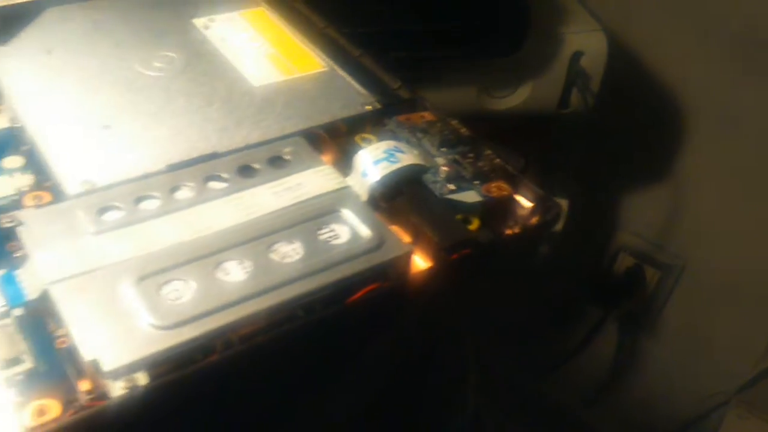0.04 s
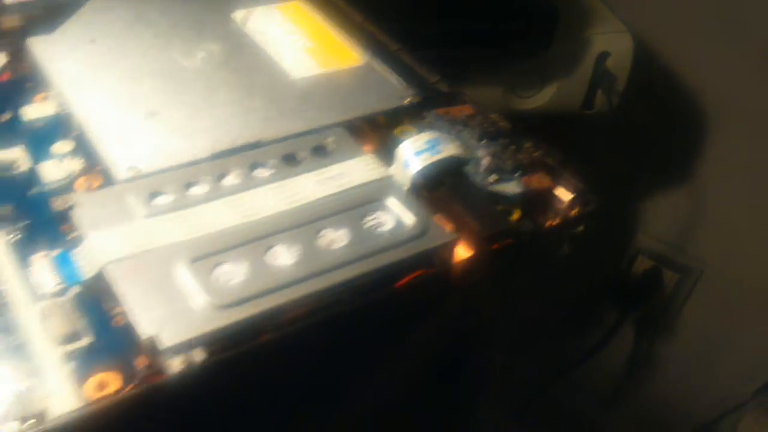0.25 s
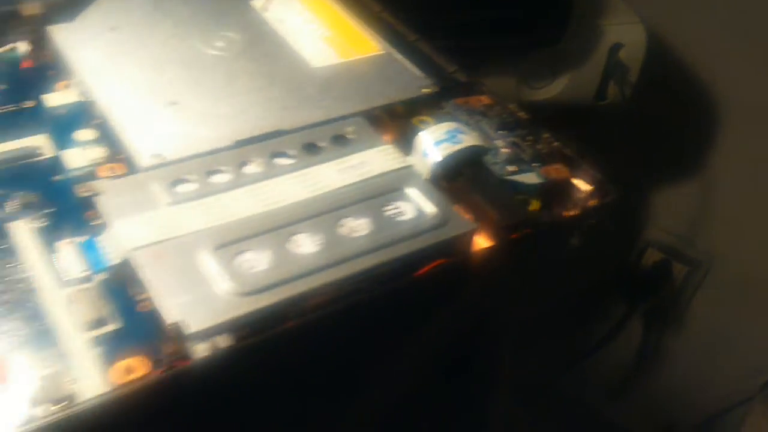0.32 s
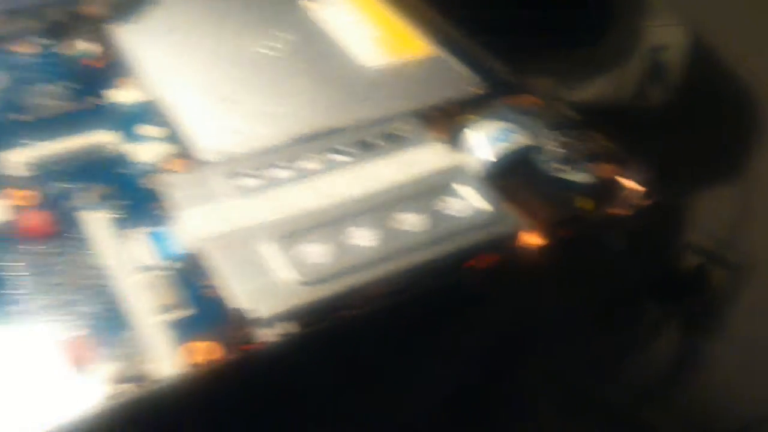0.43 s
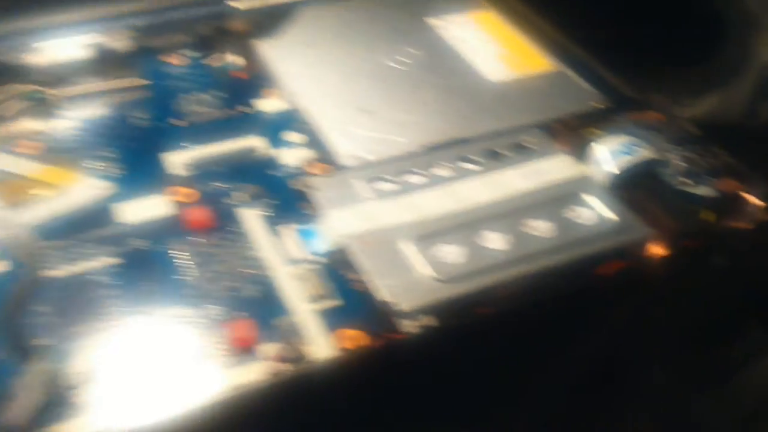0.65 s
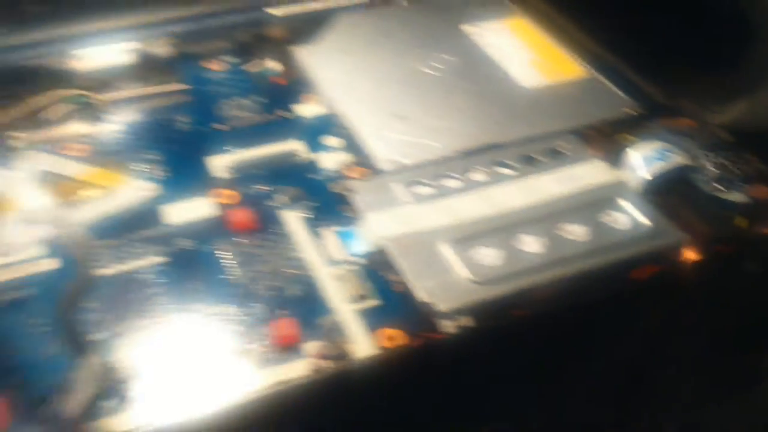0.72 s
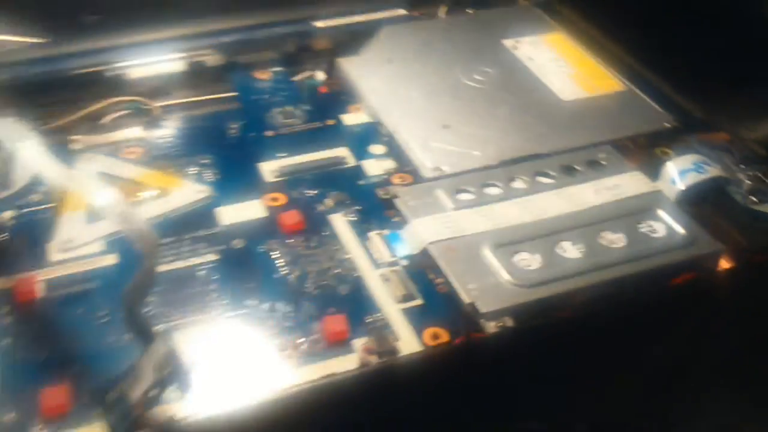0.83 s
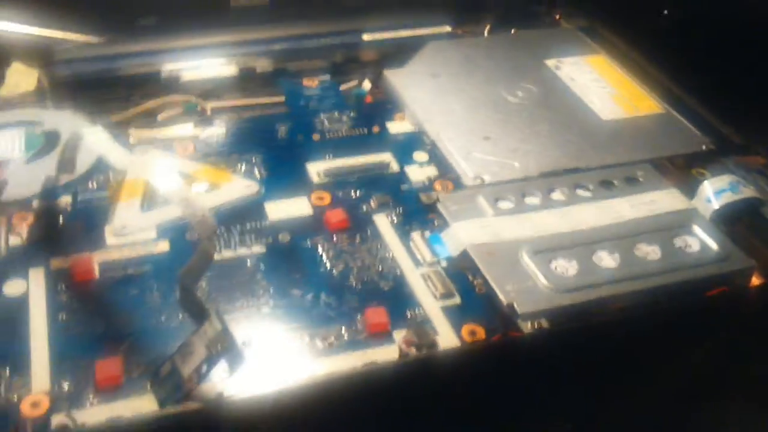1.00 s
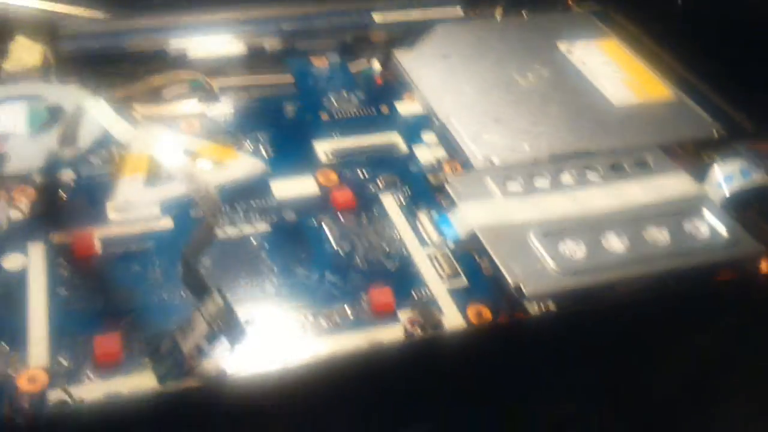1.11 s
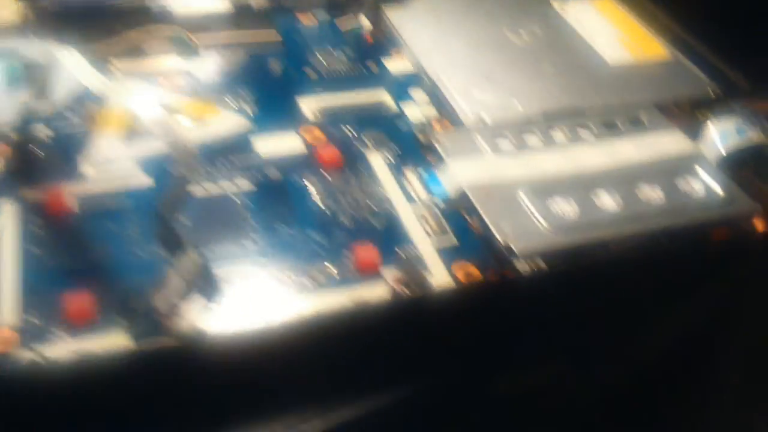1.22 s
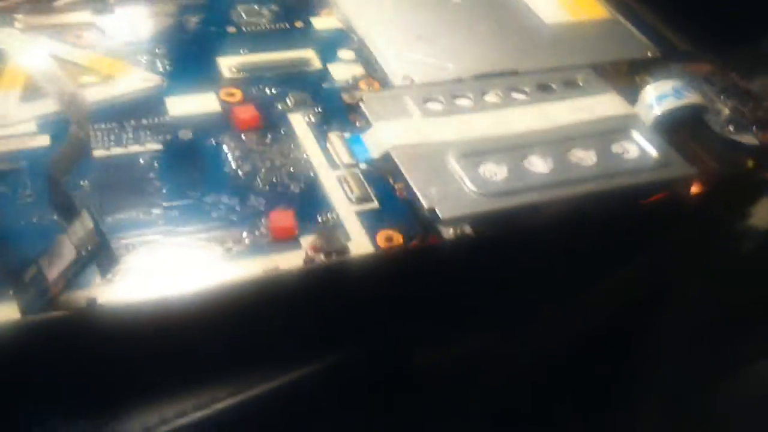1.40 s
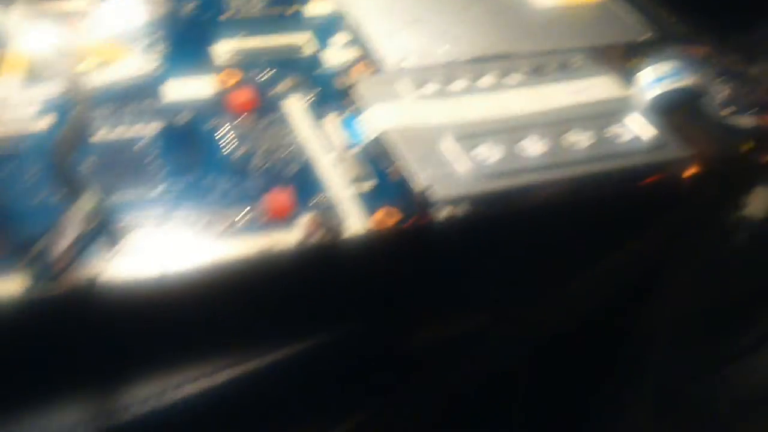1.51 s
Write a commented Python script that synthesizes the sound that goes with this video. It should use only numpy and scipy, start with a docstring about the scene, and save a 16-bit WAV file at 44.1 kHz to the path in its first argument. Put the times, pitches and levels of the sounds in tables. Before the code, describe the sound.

A hard drive clicks sharply a few times, then chatters briefly over a faint hum.

```python
"""A small quiet room, close to a failing hard drive in an opened laptop.
The head arm knocks against its stop, and each impact excites the damped modes of case, lid and arm.
It then chatters in four short scrapes, whose tiny slips rasp the case and make the suspension squeak.
The room answers with a brief reverberation. A faint tick and a soft tap follow the first knock;
under it all lie a wavering hum, a low rumble and faint hiss."""
import sys
import numpy as np
from scipy import signal
from scipy.fft import rfft, irfft
from scipy.io import wavfile
from scipy.ndimage import uniform_filter1d

SR = 44100
rng = np.random.default_rng(int(sys.argv[2]) if len(sys.argv) > 2 else 0)


def store_wav(level_fs):
    """Save 16-bit WAV to argv[1]."""
    pcm = np.round(np.clip(np.atleast_2d(level_fs), -1, 1) * 32767)
    wavfile.write(sys.argv[1], SR, pcm.T.astype(np.int16))


N = 68355
T = np.arange(N) / SR
PIVOT_HZ = 3610  # spectral tilts of knocks and scrapes hinge here


def amp(db):
    """Amplitude ratio of a level in decibels."""
    return 10 ** (np.asarray(db) / 20)


def fade(t60, hold=0):
    """Exponential decay of 60 dB in t60 seconds, after a hold."""
    return np.exp(-np.log(1000) * np.maximum(T - hold, 0) / t60)


def noise(points):
    """Random-phase noise of unit rms, its spectrum shaped by (frequency [Hz], level [dB]) points."""
    hz, db = np.array(points).T
    f = np.maximum(np.fft.rfftfreq(N, 1 / SR), 1)
    magnitude = amp(np.interp(np.log(f), np.log(hz), db))
    x = irfft(magnitude * np.exp(2j * np.pi * rng.random(len(f))), N)
    return x / x.std()


def drift(rate):
    """Slow fluctuation: random values, `rate` a second, smoothed by moving averages."""
    span = int(SR / rate)
    steps = rng.standard_normal(256)[np.arange(N) // span % 256]
    return uniform_filter1d(uniform_filter1d(steps, span), span)


def ring(modes, colour=np.zeros_like):
    """Modal superposition: damped sines scaled to unit starting rms, then weighted by colour(hz) in dB."""
    hz, db, t60 = np.array(modes).T
    gains = amp(db + colour(hz)) / np.sqrt(np.sum(amp(db) ** 2) / 2)
    return sum(gain * fade(decay) * np.sin(2 * np.pi * (f * T + rng.random()))
               for f, gain, decay in zip(hz, gains, t60))


def at(start, x):
    """Pure delay of `start` seconds."""
    return np.concatenate([np.zeros(int(start * SR)), x])[:N]


def through(x, response):
    """Convolution: the output of a linear system with this impulse response."""
    return signal.fftconvolve(x, response)[:N]


def drone(levels, hz, wander, rate):
    """Amplitude and frequency modulation: a tone follows a level contour while its pitch drifts."""
    frequency = hz * (1 + wander * drift(rate))
    rms = amp(np.interp(T, *np.array(levels).T))
    return rms * np.sqrt(2) * np.sin(2 * np.pi * np.cumsum(frequency) / SR)


def background():
    """Superposition of two modulated tones, a hum and a rumble, with steady broadband noise."""
    # level contours of the hum and the rumble (time [s], level [dB])
    hum_levels = [(0.0, -49), (0.254, -45.5), (0.31, -49), (0.508, -44), (0.544, -51), (0.646, -43.5),
                  (0.698, -43), (0.806, -53), (0.872, -45.5), (0.948, -50.5), (1.048, -42), (1.134, -47.5),
                  (1.208, -44.5), (1.282, -50), (1.424, -45.5), (1.55, -47)]
    rumble_levels = [(0.0, -51.5), (0.228, -50.5), (0.262, -67), (0.334, -43.5), (0.422, -63), (0.492, -45),
                     (0.538, -64), (0.65, -55.5), (0.692, -55), (0.73, -51), (1.106, -59), (1.14, -49),
                     (1.332, -59), (1.386, -52.5), (1.5, -52.5)]
    # spectrum of air and hiss (frequency [Hz], relative density [dB])
    air_spectrum = [(25, -41), (45, -17), (90, 7), (150, -5.5), (220, 1.5), (330, -7), (480, -11),
                    (750, -17), (1100, -17.5), (1800, -20), (2400, -18.5), (2900, -17.5), (3300, -21),
                    (3700, -19.5), (4700, -24.5), (9000, -26), (15500, -28)]
    hum = drone(hum_levels, hz=119.7, wander=0.0064, rate=12.4)
    rumble = drone(rumble_levels, hz=52.3, wander=0.094, rate=7.3)
    return hum + rumble + amp(-56) * noise(air_spectrum)


def room(x):
    """Diffuse reverberation: dense reflections build up, then decay at each band's own rate."""
    # overlapping bands of the room response (frequency [Hz], level [dB], t60 [s])
    bands = [(300, -1.5, 0.12), (600, 1, 0.38), (930, 3.5, 0.27), (1990, -4, 0.3), (3250, -11, 0.23),
             (6070, -8.5, 0.28), (9300, -14, 0.16), (16100, -2, 0.22)]
    delay_s, build_s, size = 0.0053, 0.0017, 16384
    hz, db, t60 = np.array(bands).T
    t, f = T[:size], np.maximum(np.fft.rfftfreq(size, 1 / SR), 1)
    white = rfft(rng.standard_normal(size))
    response = 0
    for share, level_db, decay in zip(np.eye(len(hz)), db, t60):
        envelope = np.exp(-np.log(1000) * t / decay) * (1 - np.exp(-t / build_s))
        band = irfft(white * np.interp(np.log(f), np.log(hz), share), size)
        response = response + amp(level_db) * band * envelope / np.linalg.norm(envelope)
    return through(x, at(delay_s, response))


def tick(hz=9900):
    """A noise transient: a high band decays fast and is heard as a faint, thin tick."""
    band = noise([(hz / 2, -20), (hz, 0), (hz * 2, -20)])
    return amp(-54) * band * fade(t60=0.015)


def tap(hz=410):
    """A heavily damped oscillation: a soft, dull tap that dies within a few cycles."""
    return amp(-37.5) * fade(t60=0.0094) * np.sin(2 * np.pi * hz * T)


def scrapes():
    """Stick-slip friction: bursts of tiny slips rasp the case and make the suspension squeak."""
    # scrapes of the arm, the later ones duller
    # (time [s], length [s], rasp level [dB], treble tilt [dB/octave], squeak level [dB], swell [dB])
    bursts = [(0.604, 0.0062, -37.5, 1.5, -34, -3), (0.6257, 0.00635, -40, 1, -33.5, 4),
              (0.6674, 0.0074, -38.5, -4.5, -40.5, 5), (0.699, 0.0089, -48, -13, -66, -10)]
    # spectrum of the dense, short-lived case modes (frequency [Hz], relative density [dB])
    rasp_spectrum = [(150, -30), (650, -11.5), (1000, -4.5), (2500, 4.5), (4500, 3), (7500, 1), (10000, -5),
                     (16000, -13)]
    # resonances of the head suspension (frequency [Hz], relative level [dB], t60 [s])
    suspension_modes = [(3460, -9.5, 0.027), (4640, -10, 0.037), (5500, -20, 0.014), (6300, -4, .01),
                        (6800, 8.5, 0.011), (6800, -9, .009), (7280, -1, 0.011), (8270, -8, .009),
                        (8030, 3, 0.016), (8730, -15, 0.03), (11500, -18, .015)]
    slips_per_s, scatter_db = 4700, 3.5
    hz, spectrum_db = np.array(rasp_spectrum).T
    octaves_above = np.maximum(np.log2(hz / PIVOT_HZ), 0)
    out = 0
    for start, length, rasp_db, treble_db, squeak_db, swell_db in bursts:
        slips = (rng.random(N) < slips_per_s / SR) * amp(scatter_db * rng.standard_normal(N))
        slips *= np.sign(rng.standard_normal(N))
        slips[0] = 1  # every scrape opens with a slip
        slips *= (T < length) * amp(swell_db * np.minimum(T / length, 1))
        power = np.abs(through(slips ** 2, fade(t60=0.021) ** 2))  # incoherent slips add in power
        rasp = np.sqrt(power) * noise(np.c_[hz, spectrum_db + treble_db * octaves_above])
        squeak = through(slips, ring(suspension_modes))
        for db, x in (rasp_db, rasp), (squeak_db, squeak):
            rms = np.sqrt(np.sum(x ** 2) / (length * SR))  # whole energy over the scrape's length
            out = out + at(start, amp(db) * x / rms)
    return out


def crack(spectrum, contact_s):
    """Frequency-dependent damping: dense modes merge into noise whose treble dies sooner."""
    dense = noise(spectrum)
    treble = signal.sosfiltfilt(signal.butter(2, 7600, "high", fs=SR, output="sos"), dense)
    return (dense - treble) * fade(t60=0.03, hold=contact_s) + treble * fade(t60=0.0098, hold=contact_s)


def knocks():
    """Impact excitation: each blow rings case, lid, arm and room with its own loudness and brightness."""
    # blows of the arm on its stop (time [s], case level [dB], treble tilt [dB/octave],
    # bass tilt [dB/octave], lid level [dB], arm level [dB], contact [s], room gain [dB])
    blows = [(0.2355, -23, -6.5, -1.5, -24, -54, .001, -0.5),
             (0.4617, -28.5, 11, 4.5, -25.5, -22.5, 0.002, -2.5),
             (.4720, -31, -23, 2.5, -34, -37, 0.00076, 0), (0.4875, -26, -2.5, 1.5, -22.5, -58, 0.0018, -3),
             (0.5043, -20, 2.5, -2.5, -16.5, -47, 0.0029, 0), (.5154, -25, -4, 1, -25, -54, 0.0037, -1.5)]
    # modes of the case, the drive's lid and the arm (frequency [Hz], relative level [dB], t60 [s])
    case_modes = [(992, -16.5, 0.08), (1190, -15, .03), (1696, -8, 0.068), (2018, -4.5, 0.038),
                  (2387, 4.5, 0.031), (2505, 6, 0.016), (2620, -18, 0.016), (2850, -2.5, 0.061),
                  (2920, -7.5, 0.046), (4155, -2.5, 0.057), (4960, -22, 0.068), (5180, -13, 0.05)]
    lid_modes = [(3177, -3.5, 0.022), (3442, -3, 0.023)]
    arm_modes = [(6050, -14, .014), (6760, -7, 0.015), (7220, -2.5, 0.031), (7400, -8, 0.013),
                 (8700, -12, 0.015), (10530, -6.5, .014), (11400, -2.5, 0.011), (15300, -9, .005)]
    # spectrum of the dense, short-lived case modes (frequency [Hz], relative density [dB])
    crack_spectrum = [(100, -45), (250, -8.5), (650, -22), (900, -16.5), (1500, -10), (2400, -1.5),
                      (3200, -0.5), (4200, -9), (6500, -8), (9000, -10), (12000, -27), (16000, -35)]
    crack_db, ring_db, attack_s = -1.5, -3.5, 0.00036
    hz, spectrum_db = np.array(crack_spectrum).T
    out = 0
    for start, case_db, treble_db, bass_db, lid_db, arm_db, contact_s, room_db in blows:
        def tilt(f):
            octaves = np.log2(f / PIVOT_HZ)
            return treble_db * np.maximum(octaves, 0) + bass_db * np.clip(-octaves, 0, 2)
        case = amp(crack_db) * crack(np.c_[hz, spectrum_db + tilt(hz)], contact_s)
        case += amp(ring_db) * ring(case_modes, tilt)
        blow = amp(case_db) * case + amp(lid_db) * ring(lid_modes) + amp(arm_db) * ring(arm_modes)
        blow = at(start, blow * (1 - np.exp(-T / attack_s)))
        out = out + blow + amp(room_db) * room(blow)  # a moving listener meets new reflections each time
    return out


def scene():
    """Superposition of all sources; the small case radiates poorly at long wavelengths."""
    radiation = signal.butter(2, 390, "high", fs=SR, output="sos")
    chatter = scrapes()
    drive = signal.sosfilt(radiation, knocks() + chatter + amp(-0.5) * room(chatter))
    return (drive + at(0.3212, tick()) + at(0.3492, tap()) + background())[None]


def record(dry):
    """Band limiting: a steep low-pass removes the treble above 15.9 kHz."""
    return signal.sosfilt(signal.ellip(10, .2, 70, 15900, fs=SR, output="sos"), dry)


dry = scene()
out = record(dry)
store_wav(out)
```